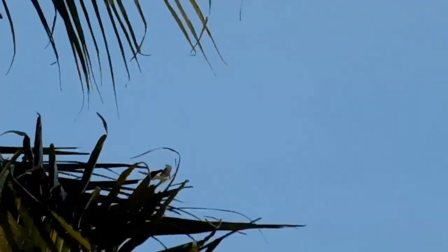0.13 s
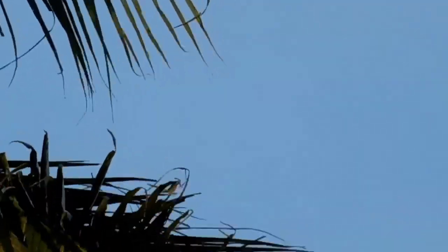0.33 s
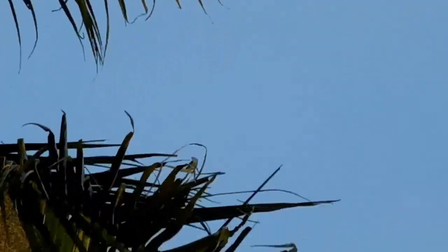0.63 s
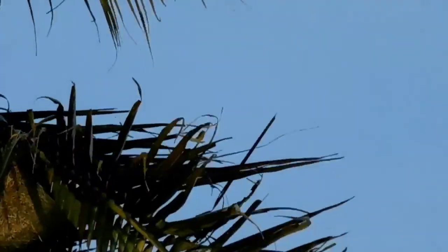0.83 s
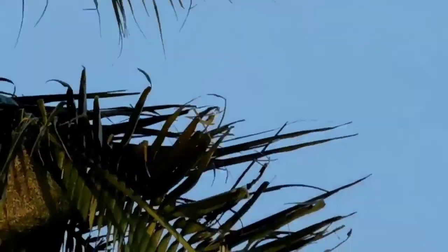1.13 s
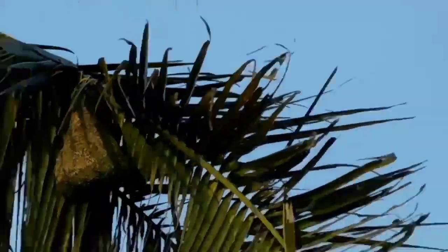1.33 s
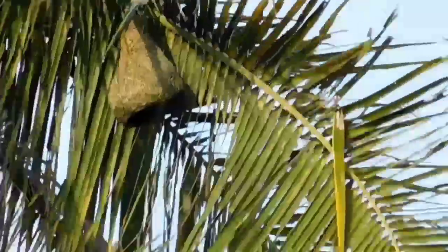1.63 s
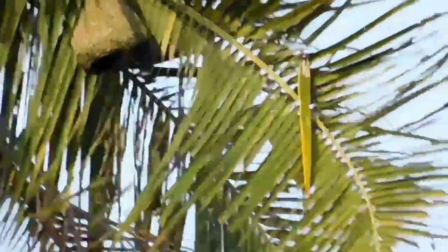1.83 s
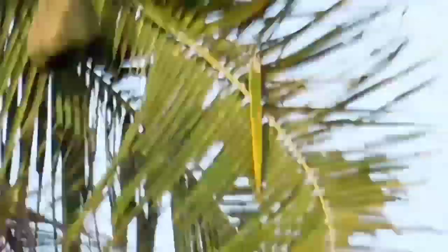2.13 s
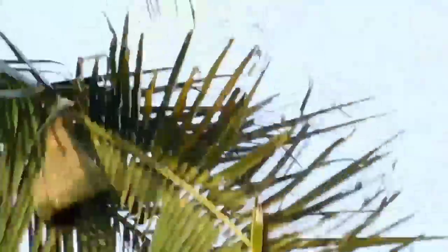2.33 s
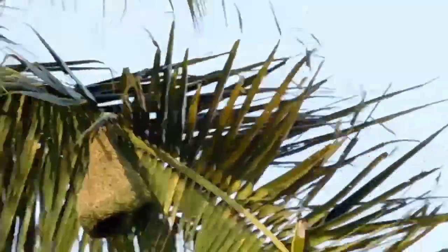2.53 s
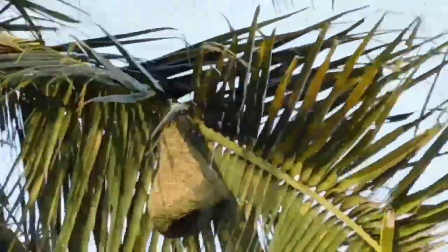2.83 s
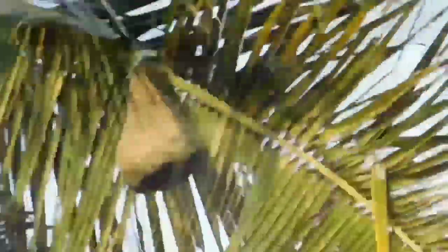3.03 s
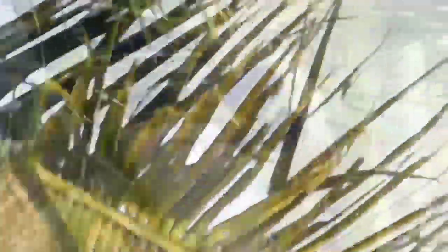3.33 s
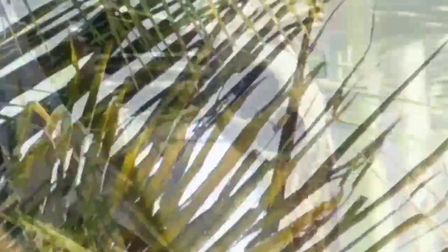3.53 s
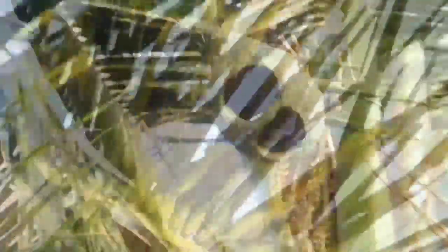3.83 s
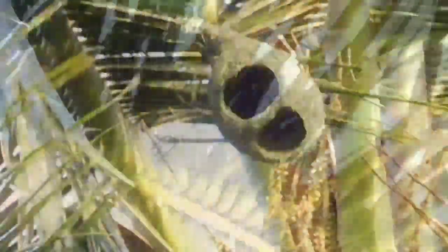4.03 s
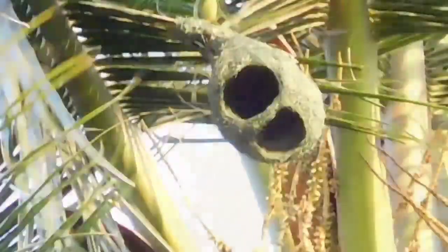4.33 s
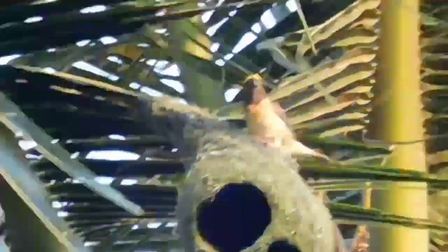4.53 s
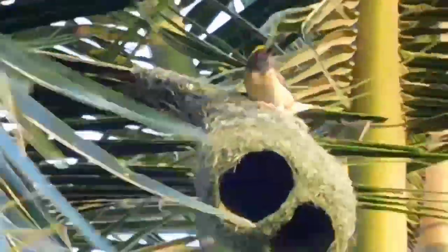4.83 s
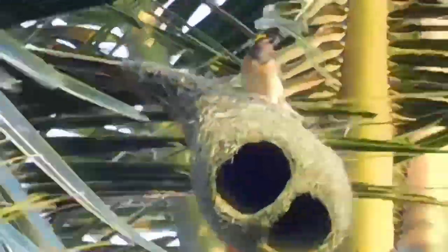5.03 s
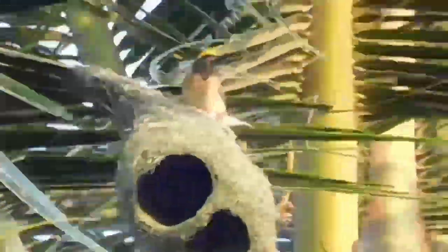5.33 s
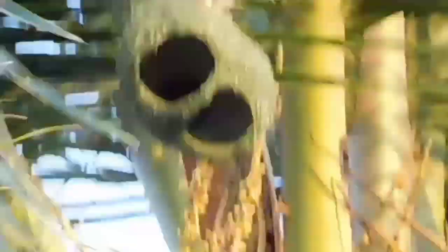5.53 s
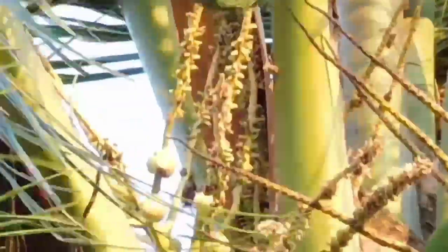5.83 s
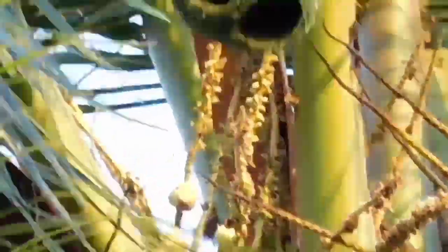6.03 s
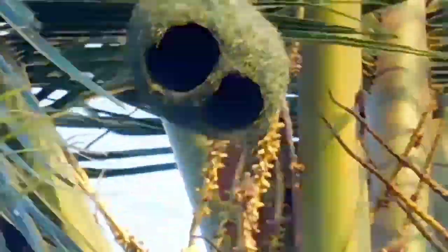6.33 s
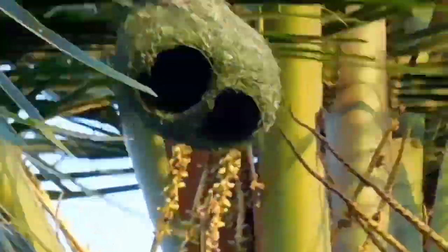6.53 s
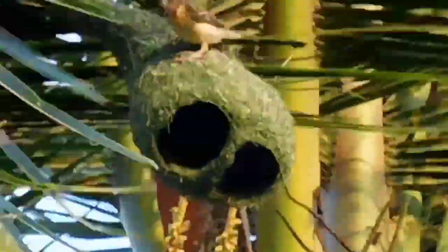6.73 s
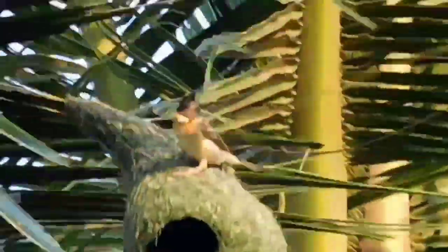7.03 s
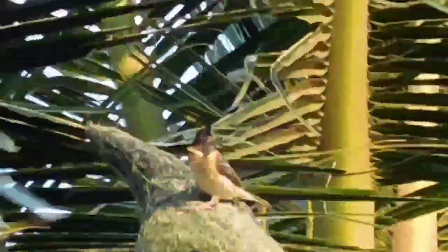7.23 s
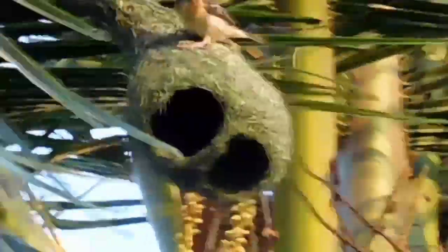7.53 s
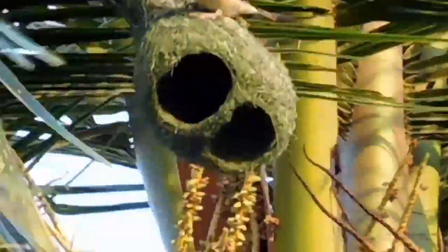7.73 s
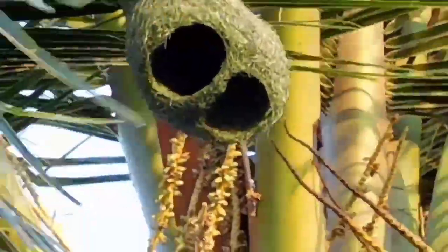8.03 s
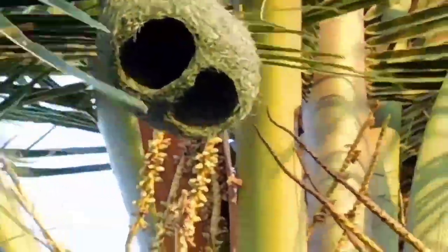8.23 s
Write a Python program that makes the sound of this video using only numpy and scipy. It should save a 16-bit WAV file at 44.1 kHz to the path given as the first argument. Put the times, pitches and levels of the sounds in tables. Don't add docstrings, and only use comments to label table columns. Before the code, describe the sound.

Outdoors among palm fronds, faint high chirps give way to loud, rapid weaver bird calls over rustling leaves, ending in abrupt wind buffeting.

```python
import sys
import numpy as np
from scipy import signal
from scipy.io import wavfile
from scipy.ndimage import uniform_filter1d, minimum_filter1d

SR = 44100
rng = np.random.default_rng(int(sys.argv[2]) if len(sys.argv) > 2 else 0)


def volts_from_db(level):
    exponent = np.asarray(level, float) / 20
    return 10 ** exponent


def store_pcm(level_fs):
    pcm = np.round(np.clip(level_fs, -1, 1) * 32767).astype(np.int16)
    wavfile.write(sys.argv[1], SR, np.atleast_2d(pcm).T)


N = 370440

# (call length [ms], first crest [ms], first dip length [ms], quickening [power])
WARBLES = [
    (82, 9, 32, 1.7),
    (74, 7, 25, 1.08),
    (68, 7, 26, 1.85),
    (72, 2, 75, .7),
    (68, 10, 28, 1.46),
    (71, 3, 29, 1.27),
]
# (first crest [Hz], last crest [Hz], first dip depth [Hz], last dip depth [Hz])
PITCHES = [(5700, 4800, 1250, 550), (6200, 4750, 1200, 1400), (5700, 4900, 200, 900),
           (6800, 4150, 2250, 300), (5500, 4050, 950, 650), (5050, 4200, 850, 1150)]
# (level before swell [dB], loudest [ms], swell half width [ms], level after [dB], left-right [dB])
EFFORTS = [(-2, 18, 10, -6.5, -1.1), (-3.5, 37, 14, -3, -3.2), (-4, 25, 14, -5, -.6),
           (-8.5, 39, 12, -11, 2.5), (-6, 32, 14, -4, -2.5), (-5, 31, 15, -3, -1.7)]
# (start [ms], end [ms], first pitch [Hz], last pitch [Hz], level [dB])
SECOND_SLURS = [(26, 84, 4900, 4500, -7.5), (-5, 70, 5400, 4550, -9), (0, 64, 6050, 5150, -8.5),
                (3, 72, 5900, 5000, -19), (-5, 50, 6200, 4400, -14), (20, 50, 4600, 4200, -34)]
SECOND_SCOOPS_HZ = [-200, 1200, -200, -900, 0, 0]
SCOOP_HZ_PER_MS, EDGE_MS, EDGE_DB = 60, 8, -5.5

# (time [s], level [dB], pitch [factor], length [factor])
ARCH_CALLS = [(3.447, -47.5, 1, 0.96), (3.808, -49, 1.001, 0.96), (4.075, -54, 1.001, 0.8),
              (4.15, -44.5, .97, .99), (4.695, -36.5, 1.016, 0.91), (4.965, -40.5, 1.03, 0.9),
              (5.41, -41.5, 1.015, 0.91), (5.705, -43, .98, 0.9), (6.017, -40, 1.001, 1.001),
              (6.428, -39, 0.99, 1.1), (6.96, -36, 1.02, .96), (7.076, -42.5, 1.01, 1.03),
              (7.971, -41, .97, 1.02)]
ZIGZAG_CALLS = [(3.691, -47, 0.99, 0.8), (4.415, -40, 0.99, 0.95), (5.131, -37.5, 0.99, 0.86),
                (5.807, -36.5, .98, 0.88), (6.551, -38.5, 1, .95), (7.208, -38.5, 1, 1),
                (7.397, -36, 0.99, .85), (7.668, -45, .95, 0.84), (8.295, -38.5, .96, .97)]
SLIDE_CALLS = [(3.878, -41.5, .95, 0.89), (4.275, -44, 0.96, 1.02), (4.81, -38, .97, 1),
               (5.201, -40.6, 1.03, 0.93), (6.116, -43, .99, 1.22), (6.35, -37, 1.001, .85),
               (6.853, -39, 0.98, .96), (7.895, -44.5, 1.001, 1.05), (8.09, -36.5, .98, .95)]
DROP_CALLS = [
    (0.317, -49, 0.96, 1.4),
    (0.987, -49.5, 0.95, 1),
    (1.774, -47.5, 1, 0.84),
    (2.485, -51.5, .99, .96),
]
DIP_CALLS = [
    (.765, -53.5, 1.09, 0.77),
    (2.67, -49, 1.03, 0.98),
    (3.119, -51.5, .98, .92),
]
TWIRL_CALLS = [
    (.551, -46.5, 0.995, 0.92),
]

# (time [s], length [s], first pitch [Hz], last pitch [Hz], level [dB])
FAR_NOTES = [(.198, .026, 5700, 5600, -59), (.345, .05, 5700, 5550, -54), (.68, .045, 4100, 3920, -59),
             (1.09, 0.028, 3700, 4100, -56), (1.465, .038, 4000, 4400, -55),
             (1.532, 0.024, 5100, 7160, -51.5), (2.223, 0.037, 4480, 4300, -54),
             (2.24, 0.04, 5630, 5860, -56), (2.87, .015, 4600, 4500, -59), (2.884, .027, 5500, 3850, -55),
             (2.9, .03, 6030, 5570, -57), (3.015, .045, 5680, 4920, -51), (3.19, .027, 4100, 4370, -57)]
NEAR_NOTES = [(4.415, 0.034, 5900, 5330, -40.5), (4.542, .03, 5600, 4320, -46),
              (4.865, 0.041, 4970, 4860, -38), (4.9, .04, 4860, 3860, -45),
              (5.735, 0.065, 5880, 4920, -41.5), (5.75, 0.05, 5010, 3860, -38),
              (7.635, .03, 4700, 4410, -45), (7.687, 0.035, 5500, 4730, -41.5),
              (8.31, 0.024, 5530, 5360, -36.5)]
RIGHT_NOTES = [
    (2.256, 0.088, 4000, 3730, -61),
    (2.758, 0.033, 5200, 4900, -58),
    (7.06, 0.046, 4500, 4030, -46),
]

# (delay [s], level [dB])
FROND_ECHOES = [
    (.0052, -13),
    (.0105, -14.5),
]
SCATTER_DB, SCATTER_T60_S = -10.5, .11

# (time [s], rustle level [dB])
BREEZE = [(0, -55.5), (2.1, -56.5), (2.3, -55.5), (2.83, -61.5), (3.25, -59.5), (4.21, -51), (4.43, -50.5),
          (4.5, -45.5), (4.7, -46), (6.8, -46.5), (8.4, -48)]
NEAR_FROM_S, NEAR_FULL_S = 3.4, 4.5
# (frequency [Hz], density [dB per Hz])
FAR_LEAVES = [(100, 4), (250, 0.5), (1350, 2.5), (2200, 0), (3700, -1.5), (5600, -6.5), (8000, -9),
              (15500, -10.5)]
NEAR_LEAVES = [(100, -1), (250, -3), (600, 1.5), (2200, 0.5), (3700, -2), (5600, -7.5), (8000, -10),
               (15500, -11.5)]
# (frequency [Hz], left-right likeness [-1..1])
FAR_ALIKE = [(60, 1), (240, 0.41), (950, 0.44), (3770, -0.29), (15000, 0.087)]
NEAR_ALIKE = [(60, 0.97), (180, 0.65), (550, 0.79), (1650, 0.44), (4970, 0.05), (15000, 0.04)]

# (time [s], rumble level [dB], left-right [dB])
WIND = [(0, -61, -3), (.63, -55, -.1), (.72, -50.5, -8), (.84, -44, -6), (1.12, -52.5, -3), (1.3, -61, -2),
        (1.59, -55.5, -3), (2.03, -62, .1), (2.36, -53, 1), (2.62, -61, 3), (3.06, -64, -3),
        (3.79, -70, -.4), (5.3, -58, 3), (7.56, -61.5, 1), (7.82, -45, 12), (8.05, -51, -4), (8.26, -31, 5),
        (8.4, -33, -6)]
# (time [s], buffeting level [dB])
GUST = [
    (7.6, -62),
    (7.632, -56),
    (7.838, -50),
    (8.058, -58),
    (8.108, -61),
    (8.152, -23),
    (8.4, -24.5),
]
# (time [s], peak level [dB], swing [Hz])
LEFT_EDDIES = [(7.665, -38, 350), (8.148, -9.5, 430), (8.157, -6.5, 676), (8.166, -7.5, 360),
               (8.173, -9, 780), (8.199, -12, 550), (8.218, -12, 353), (8.233, -8, 1030), (8.236, -10, 453),
               (8.291, -19, 450), (8.328, -13.5, 690), (8.361, -16, 600), (8.375, -12, 510)]
# (time [s], peak level [dB])
RIGHT_EDDIES = [
    (.815, -30.5),
    (8.244, -15),
    (8.302, -15),
    (8.349, -9),
    (8.361, -7.5),
    (8.377, -17),
]
RIGHT_SWING_HZ = 272
SHED_FROM_S, SHED_DB, SHED_HZ = 8.18, -19.5, 484

CREAK_PARTIALS_DB = [-0.5, 2, -5, -6, -9, -17]
CREAK_S, CREAK_EDGE_S, CREAK_HOLD_S, CREAK_PER_S, CREAK_DB = 2.225, 0.019, 0.037, 226, -49.5

GATE_DB = 2.5
TOP_HZ = 15330


def rms_one(x):
    return x / np.sqrt(np.mean(x ** 2) + 1e-20)


def in_time(rows):
    s, *columns = np.transpose(rows)
    return [np.interp(np.arange(N) / SR, s, c) for c in columns]


def at_hz(points, hz):
    point_hz, value = np.transpose(points)
    return np.interp(np.log(hz), np.log(np.maximum(point_hz, 1)), value)


def drift(rate, size):
    r = np.exp(-20 * np.pi * rate / SR)
    slow = signal.lfilter([1], [1, -2 * r, r * r], rng.standard_normal(size // 10 + 3002))[3000:]
    return np.interp(np.arange(size) / 10, np.arange(len(slow)), rms_one(slow))


def band(x, low_hz, high_hz):
    return signal.sosfilt(signal.butter(2, [low_hz, high_hz], "band", fs=SR, output="sos"), x)


def add(out, sound, s, pan_db):
    i = round(s * SR)
    panned = sound * volts_from_db([[pan_db / 2], [-pan_db / 2]])
    out[:, i:i + len(sound)] += panned[:, :N - i]


def bird(calls, voices, pan_db):
    out = np.zeros((2, N))
    for s, level_db, pitch, length in calls:
        for k, (ms, hz, shape_db) in enumerate(voices):
            voice_db = shape_db + level_db + 3.8 + 2 * k
            note = whistle(ms * length / 1000, hz * pitch, voice_db, waver=.011, trill=.1 * k)
            add(out, note, s + ms[0] * length / 1000, pan_db)
    return out


def first_voice(warble, pitch, effort):
    length, crest, dip, power = warble
    first_hz, last_hz, first_depth, last_depth = pitch
    before_db, loudest, swell, after_db = effort
    ms = np.arange(length + 1.)
    along = ms / length
    dips = np.abs(np.sin(np.pi * (np.maximum(ms - crest, 0) / dip) ** power))
    crests_hz = first_hz + (last_hz - first_hz) * along
    depth_hz = first_depth + (last_depth - first_depth) * along
    hz = crests_hz - depth_hz * dips - SCOOP_HZ_PER_MS * np.maximum(crest - ms, 0)
    turns = [0, EDGE_MS, loudest - swell, loudest, loudest + swell, length - EDGE_MS, length]
    start_db = before_db + EDGE_DB * min(crest / EDGE_MS, 1)
    turns_db = [start_db, before_db, before_db, 0, after_db, after_db, after_db + EDGE_DB]
    return ms, hz, np.interp(ms, np.maximum.accumulate(turns), turns_db)


def second_voice(start, end, first_hz, last_hz, level_db, scoop_hz):
    ms = np.array([start, start + EDGE_MS, end])
    hz = np.array([first_hz - scoop_hz, first_hz, last_hz])
    return ms, hz, level_db + np.array([EDGE_DB, 0, EDGE_DB / 2])


def whistle(s, hz, level_db, waver, trill):
    t = np.arange(s[0], s[-1], 1 / SR)
    shake = trill * np.linspace(0, 1, len(t)) * np.sin(2 * np.pi * (78 * t + rng.random()))
    pitch = uniform_filter1d(np.interp(t, s, hz), size=70) * (1 + waver * drift(190, len(t)) + shake)
    phase = 2 * np.pi * (np.cumsum(pitch) / SR + rng.random())
    edge = np.clip(np.minimum((t - s[0]) / 0.0013, (s[-1] - t) / 0.0011), 0, 1)
    rasp_db = 2.2 * drift(90, len(t)) + np.linspace(1, 4, len(t)) * drift(500, len(t))
    tone = np.sin(phase) + volts_from_db(-26.0) * np.sin(2 * phase)
    return edge * volts_from_db(np.interp(t, s, level_db) + rasp_db) * tone


def plain_slurs(notes, pan_db):
    out = np.zeros((2, N))
    for s, length, first_hz, last_hz, level_db in notes:
        path = np.linspace(first_hz, last_hz, 3)
        swell_db = level_db + np.array([-3, 0, -3])
        note = whistle(np.linspace(0, length, 3), path, swell_db, waver=.025, trill=.04)
        add(out, note, s, pan_db)
    return out


def fronds_echo(x):
    out = x.copy()
    t = np.arange(0, SCATTER_T60_S, 1 / SR)
    haze = rng.standard_normal((2, len(t))) * volts_from_db(-60 * t / SCATTER_T60_S)
    haze /= np.sqrt(np.sum(haze ** 2, axis=1, keepdims=True))
    out += volts_from_db(SCATTER_DB) * signal.oaconvolve(x, haze, axes=1)[:, :N]
    for delay, echo_db in FROND_ECHOES:
        for port in range(2):
            lag = int((delay + rng.uniform(0, .00003)) * SR)
            out[port, lag:] += volts_from_db(echo_db) * x[port, :-lag]
    out[1] = np.roll(out[1], 1) * .3 + out[1] * .7
    return out


def leaves():
    t = np.arange(N) / SR
    near = np.clip((t - NEAR_FROM_S) / (NEAR_FULL_S - NEAR_FROM_S), 0, 1)[::50]
    white = rng.standard_normal((2, 2, N))
    edges = 90 * 2 ** np.arange(0, 7.6, .5)
    out = 0
    for k, (low, high) in enumerate(zip(edges, edges[1:])):
        hz = np.sqrt(low * high)
        mid, side = band(white[k % 2], low, high)
        alike = np.clip((1 - near) * at_hz(FAR_ALIKE, hz) + near * at_hz(NEAR_ALIKE, hz), -1, 1)
        colour_db = (1 - near) * at_hz(FAR_LEAVES, hz) + near * at_hz(NEAR_LEAVES, hz)
        gain = volts_from_db(colour_db + 0.98 * drift(520, len(near)))
        mid = np.repeat(gain * np.sqrt(1 + 0.82 * alike), 50)[:N] * mid
        side = np.repeat(gain * np.sqrt(1 - 1.16 * alike), 50)[:N] * side
        out = out + np.array([mid + side, mid - side])
    duck_db = np.interp(t, [8.145, 8.165, 8.21, 8.4], [0, -3.5, -1.5, 1])
    return volts_from_db(in_time(BREEZE)[0] + duck_db + 10.0) * out * volts_from_db([[-.4], [.4]])


def wind():
    t = np.arange(N) / SR
    rumble_db, pan_db = in_time(WIND)
    shared, left, right = band(rng.standard_normal((3, N)), 15.3, 77.0)
    lumps = volts_from_db(2.1 * np.array([drift(9.0, N), drift(7.1, N)]))
    rumble = rms_one(lumps * (1.2 * shared + np.array([left, right])))
    rough = band(rng.standard_normal((2, N)), 70, 260)
    buffet = rms_one(rough * volts_from_db(2.5 * np.array([drift(40, N), drift(40, N)])))
    crackle = rms_one(band(rng.standard_normal(N), 340, 580) * volts_from_db(10.0 * drift(60, N)))
    buffet[0] += 0.4 * crackle * (t > 8.145)
    gust = volts_from_db(in_time(GUST)[0] - 3.0) * (t > GUST[0][0])
    return volts_from_db(rumble_db + 3.5 + np.array([pan_db, -pan_db]) / 2) * rumble + gust * buffet


def eddies():
    out = np.zeros((2, N))
    small = []
    for k, (a, b, c) in enumerate(rng.random(size=(12, 3))):
        port = int(k % 3 == 0)
        s = SHED_FROM_S + a * (N / SR - SHED_FROM_S)
        small.append((s, SHED_DB + 6 * (b - .5), SHED_HZ * 2 ** (c - .5 - .5 * port), port))
    strong = [(*row, 0) for row in LEFT_EDDIES] + [(*row, RIGHT_SWING_HZ, 1) for row in RIGHT_EDDIES]
    for (s, peak_db, hz, port), turn in zip(strong + small, rng.random(size=40)):
        cycles = np.arange(-2, 4, hz / SR)
        envelope = np.exp(-(cycles / np.where(cycles < 0, .3, .75)) ** 2)
        swing = envelope * np.cos(2 * np.pi * (cycles + turn))
        swing -= swing.mean()
        i = round((s - 2 / hz) * SR)
        out[port, i:i + len(swing)] += volts_from_db(peak_db) * swing[:N - i]
    return signal.sosfilt(signal.butter(4, 1500, fs=SR, output="sos"), out)


def creak():
    t = np.arange(N) / SR - CREAK_S
    phase = 2 * np.pi * np.cumsum(CREAK_PER_S * (1 + 0.022 * drift(30.5, N))) / SR
    buzz = sum(volts_from_db(db) * np.sin((k + 1) * phase) for k, db in enumerate(CREAK_PARTIALS_DB))
    edge = np.clip(np.minimum(t, 2 * CREAK_EDGE_S + CREAK_HOLD_S - t) / CREAK_EDGE_S, 0, 1)
    return volts_from_db(CREAK_DB) * buzz * edge ** 2


def scene():
    air = leaves() + wind() + eddies() + creak()
    birds = plain_slurs(FAR_NOTES, pan_db=-1.0)
    birds += plain_slurs(NEAR_NOTES, pan_db=-3.0)
    birds += plain_slurs(RIGHT_NOTES, pan_db=-11.0)
    flock = [ARCH_CALLS, ZIGZAG_CALLS, SLIDE_CALLS, DROP_CALLS, DIP_CALLS, TWIRL_CALLS]
    for k, calls in enumerate(flock):
        *effort, pan_db = EFFORTS[k]
        first = first_voice(WARBLES[k], PITCHES[k], effort)
        second = second_voice(*SECOND_SLURS[k], SECOND_SCOOPS_HZ[k])
        birds += bird(calls, (first, second), pan_db)
    return fronds_echo(birds) + air


def band_limit(x):
    return signal.sosfilt(signal.butter(12, 16460, fs=SR, output="sos"), x)


def record(dry):
    call_power = uniform_filter1d(band(dry.mean(axis=0), 3600, 6200) ** 2, size=1200)
    calls_db = 10 * np.log10(call_power + 1e-12)
    opening = np.clip((calls_db - minimum_filter1d(calls_db, size=20000) - 3) / 13, 0, 1)
    hiss_db = GATE_DB * (opening - .5 * np.roll(opening, 3000)) + .8 * drift(5, N)
    top = signal.sosfiltfilt(signal.butter(2, 6000, "high", fs=SR, output="sos"), dry)
    gated = dry + (volts_from_db(hiss_db) - 1) * top
    mix = signal.sosfilt(signal.ellip(10, .5, 80, TOP_HZ, fs=SR, output="sos"), gated)
    return band_limit(mix)


dry = scene()
out = record(dry)
store_pcm(out)
```